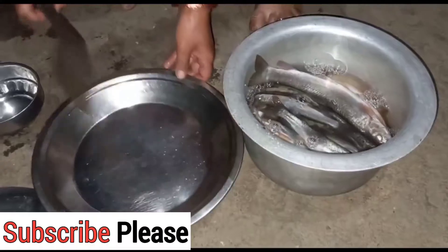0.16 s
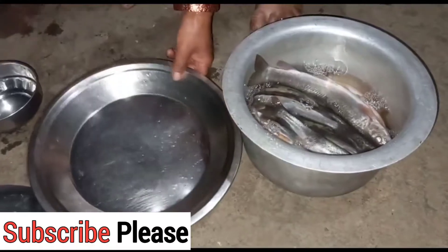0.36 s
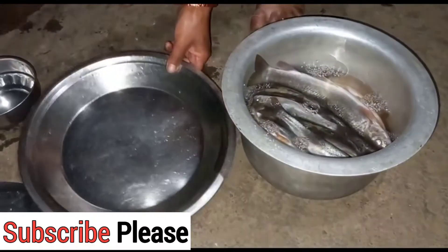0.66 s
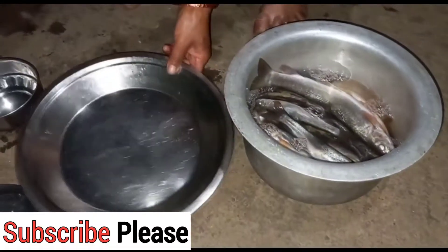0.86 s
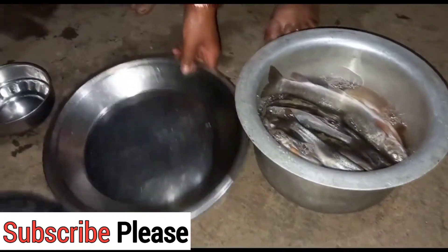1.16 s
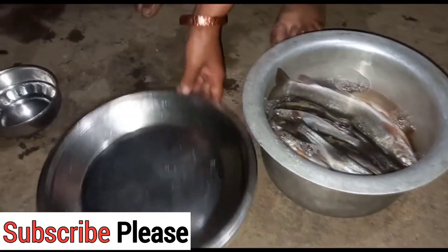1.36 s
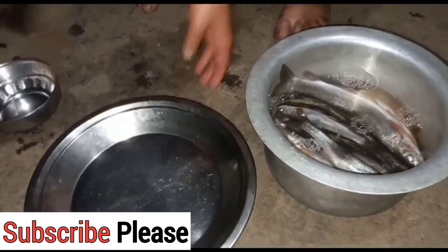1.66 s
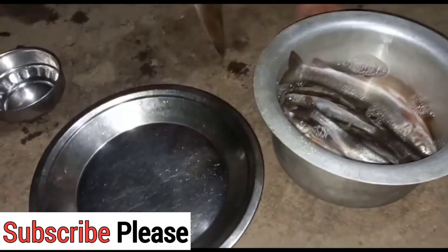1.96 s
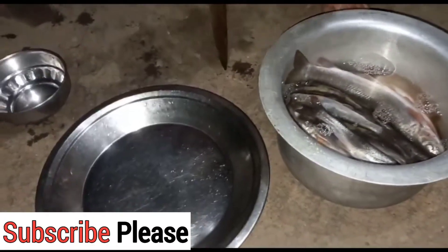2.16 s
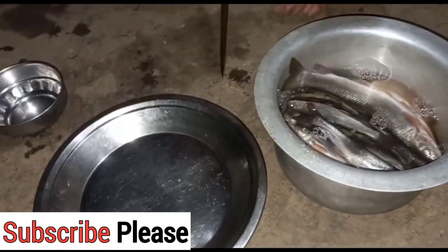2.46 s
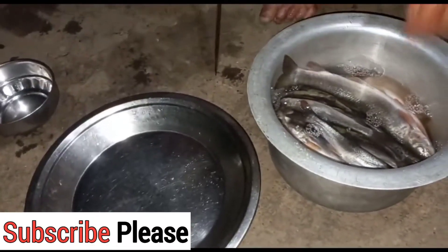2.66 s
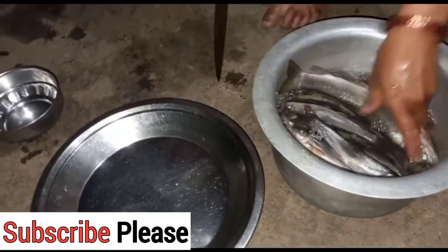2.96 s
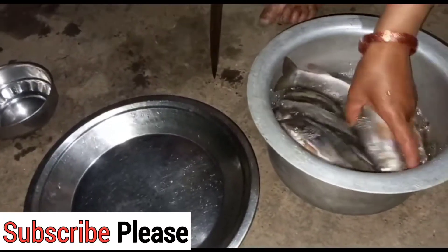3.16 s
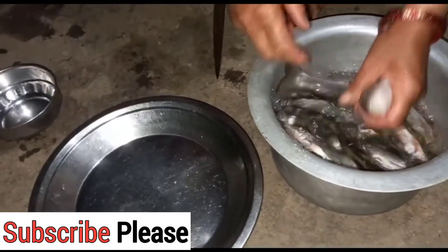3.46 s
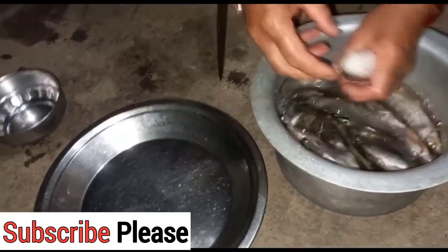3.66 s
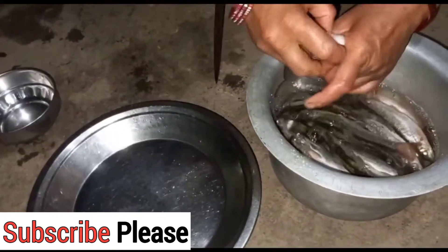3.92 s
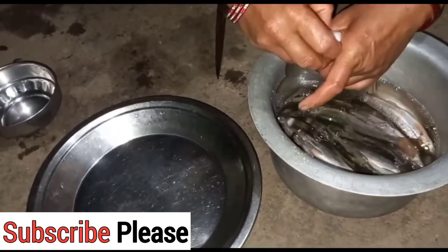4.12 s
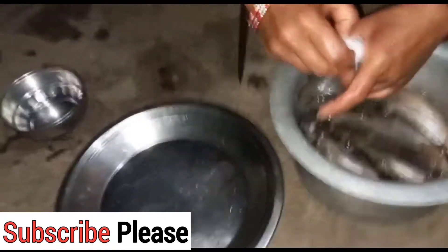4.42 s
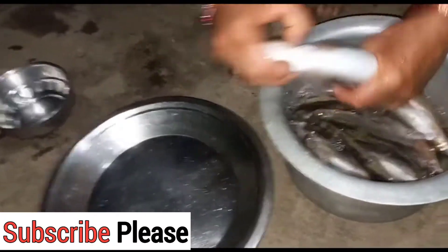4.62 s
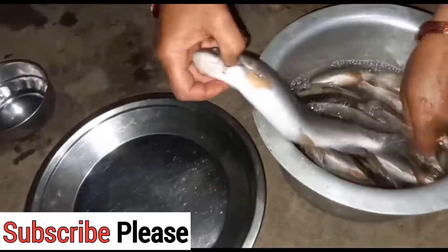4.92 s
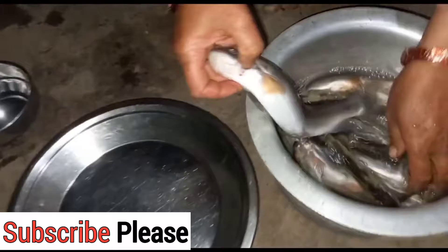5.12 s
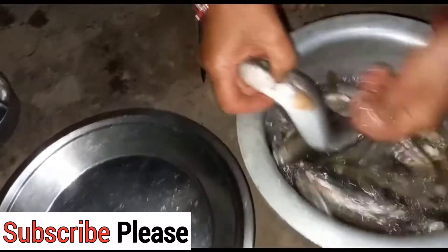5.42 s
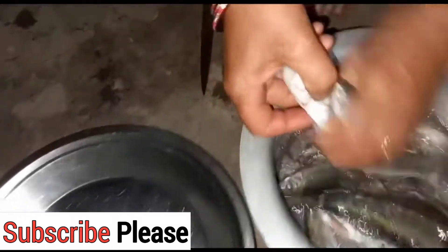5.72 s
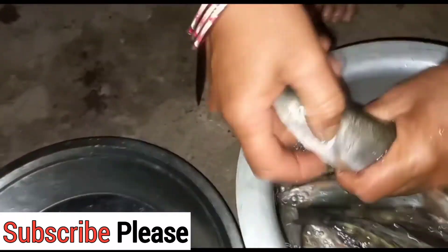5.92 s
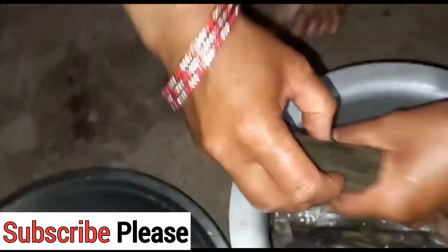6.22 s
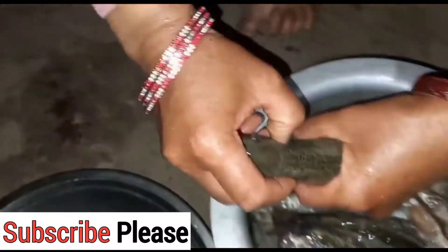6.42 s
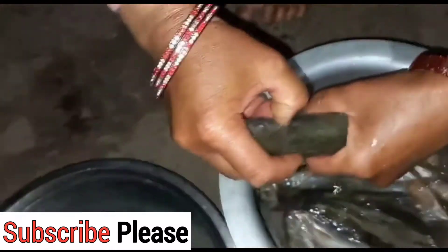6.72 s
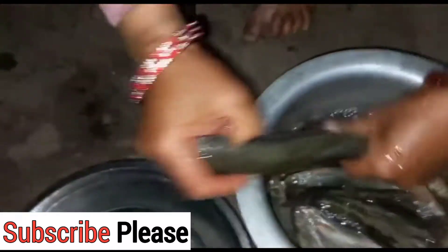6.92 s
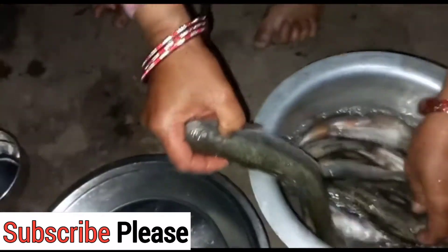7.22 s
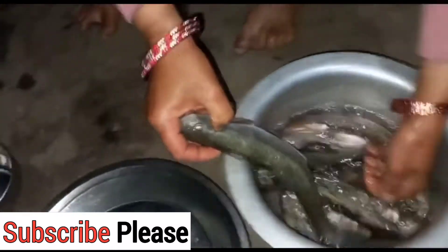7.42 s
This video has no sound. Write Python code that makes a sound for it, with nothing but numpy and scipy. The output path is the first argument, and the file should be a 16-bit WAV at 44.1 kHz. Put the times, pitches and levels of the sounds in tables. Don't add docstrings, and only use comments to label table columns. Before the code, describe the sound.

Close stereo pickup over a faint low hum, with little echo. From 0 s a thin steel basin scrapes across gritty concrete, with a hard knock at 0.16 and a lighter one near 0.4; it rings and fades by 1.0, with dull taps around 0.9. At 1.06 a bright clink starts a second, louder drag, with heavy knocks at 1.1 and 1.23; scraping lasts to about 1.7, then the rim rings away. A dull tap at 2.0, a faint clink and tap near 2.2, then near quiet. Around 3.1-3.5 hands dip into a pot: small bubbles and a gulp. Quiet faint rubbing, and one dry tap on the case at 4.57. From 5.0 fish and water are stirred, splashing at 5.4 with high drips and low surges to 6.0. From 6.15 to 6.7 come loud gurgles, plops and wet slaps. It calms, then a smaller splash and fizzing rub end it around 7.4-7.6.

```python
import sys
import numpy as np
from scipy import signal
from scipy.fft import rfft, irfft
from scipy.io import wavfile
from scipy.ndimage import uniform_filter1d

SR = 44100
rng = np.random.default_rng(int(sys.argv[2]) if len(sys.argv) > 2 else 0)


def to_wav(s):
    ch = np.atleast_2d(s).T
    pcm = np.round(np.clip(ch, -1, 1) * 32767)
    wavfile.write(sys.argv[1], SR, pcm.astype(np.int16))


def invert_db(level):
    return 10 ** (np.asarray(level, dtype=float) / 20)


N = 334271
SPAN = 3 * SR


def evened(x):
    return x / np.sqrt(np.mean(x ** 2) + 1e-20)


def read(points, hz):
    f, value = np.transpose(points)
    return np.interp(np.log(hz + 1), np.log(f + 1), value)


def control(tables, index, rest):
    t, out = np.arange(N) / SR, np.full(N, float(rest))
    for rows in tables:
        s, value = np.transpose(rows)[[0, index]]
        inside = (t >= s[0]) & (t <= s[-1])
        out[inside] = np.interp(t[inside], s, value)
    return out


def held(tables, rows):
    steps = [[(table[0][0], *row), (table[-1][0], *row)] for table, row in zip(tables, rows)]
    return [control(steps, index=k + 1, rest=0) for k in range(len(rows[0]))]


def add(mix, s, sound):
    part = mix[:, round(s * SR):][:, :sound.shape[1]]
    part += sound[:, :part.shape[1]]


def play(events, sound):
    out = np.zeros((2, N))
    for s, *shape in events:
        add(out, s, sound(*shape))
    return out


def panned(x, pan_db):
    return np.array([x * invert_db(pan_db / 2), x * invert_db(-pan_db / 2)])


def band(x, hz, width):
    edges = np.clip([hz - width / 2, hz + width / 2], 20, .49 * SR)
    return signal.sosfilt(signal.butter(2, edges, "band", fs=SR, output="sos"), x)


def noise_burst(t, hz, width):
    both, left, right = rng.standard_normal((len(t), 3)).T
    return evened(band(both + 3.0 * np.array([left, right]), hz, width))


def resonate(x, hz, width):
    turn = np.exp(2j * np.pi * np.cumsum(hz * np.ones(x.shape[-1])) / SR)
    r = np.exp(-np.pi * abs(width) / SR)
    return 2 * (turn * signal.lfilter([1 - r], [1, -r], x / turn)).real


def grains(per_s, spread_db):
    size = invert_db(spread_db * np.minimum(rng.exponential(1, N), 4)) * rng.choice([-1, 1], N)
    return evened(size * (rng.random(N) < per_s / SR))


def sharpened(x, top_db):
    top = band(x, 12000, 9000)
    return x + top * (invert_db(top_db) - 1)


# frequency in Hz, likeness (1 is the same).
LIKENESS = [(60, .9), (300, 0.74), (1000, 0.16), (4000, 0.091), (12000, 0.21)]


def noise(spectrum, patchy_db, flicker_db, size, count=N):
    frames, hz = 4 * count // size + 5, np.fft.rfftfreq(size, 1 / SR)
    a, b, c, d, patches = rng.standard_normal((frames, len(hz), 5)).T
    patches = uniform_filter1d(patches, size=6, axis=0)
    patches = evened(uniform_filter1d(patches, size=10, axis=1))
    flicker = evened(uniform_filter1d(rng.standard_normal(frames), size=3))
    same = np.clip(read(LIKENESS, hz), -1, 1)[:, None]
    left = a + 1j * b
    right = same * left + np.sqrt(1 - same ** 2) * (c + 1j * d)
    level_db = read(spectrum, hz)[:, None] + patchy_db * patches + flicker_db * np.clip(flicker, -2, 2)
    z = np.array([left, right]) * invert_db(level_db)
    return evened(signal.istft(z, nperseg=size, noverlap=3 * size // 4)[1][:, :count])


# frequency in Hz, level in dB per Hz.
HUSH_COLOUR = [(15, -59.5), (25, -32.5), (53, -29), (68, -11.5), (92, -1), (185, -31.5), (212, -24.5),
               (427, -22.5), (1230, -36.5), (1330, -33.5), (3920, -50), (6740, -38), (7920, -47),
               (14000, -45.5), (16000, -62.5)]


def hush():
    return invert_db(-61) * noise(HUSH_COLOUR, 2.9, 0.84, size=2048)


# frequency in Hz, time to fall by 60 dB in seconds.
YARD_DECAY = [(200, 0.23), (1000, 0.079), (4000, 0.17), (12000, 0.034)]


def yard(x):
    taps = np.zeros((2, SR // 2))
    at = np.arange(200, SR // 2 - 20, 20)
    at = at + rng.integers(0, 20, (2, len(at)))
    np.put_along_axis(taps, at, rng.choice([-1., 1.], at.shape), 1)
    hz, t, z = signal.stft(taps, SR, nperseg=256)
    fade = invert_db(-60 * t / read(YARD_DECAY, hz)[:, None])
    tail = signal.istft(z * fade, SR, nperseg=256)[1]
    return signal.fftconvolve(x, tail / np.linalg.norm(tail[0]), axes=1)[:, :N]


# start in seconds, level in dB, centre in Hz, width in Hz, length in seconds.
BRUSH_EVENTS = [(0.138, -33, 4480, 660, 0.17), (0.699, -48, 5200, 4800, 0.16), (1.1, -26, 3765, 90, .09),
                (2.425, -59, 5400, 9500, .11), (3.131, -56, 600, 694, 0.097), (3.15, -68, 3600, 400, .18),
                (4.638, -65.5, 5200, 3610, 0.15), (5.668, -49.5, 9000, 10100, .06),
                (6.4, -38.5, 1340, 540, 0.16), (7.157, -45, 3150, 3700, .1),
                (7.162, -50.5, 11000, 8000, .1), (7.475, -50, 1390, 1437, .09)]


def brush(db, hz, width, length):
    puff = noise_burst(np.arange(8000), hz, width)[:, :round(length * SR)]
    return invert_db(db) * puff * np.hanning(puff.shape[1])


# peak in dB, width in seconds, left over right in dB.
CASE_TAP = (-29, 0.00038, 17)


def flick():
    db, width, pan_db = CASE_TAP
    u = np.arange(-100, 200) / SR / width
    bump = (1 - u ** 2) * np.exp(-u ** 2 / 2)
    snap = 0.17 * rng.standard_normal(300) * np.exp(-abs(u) / .9)
    out = np.zeros((2, N))
    add(out, 4.5667, panned(invert_db(db) * (bump + snap), pan_db))
    return out


# time in seconds, hiss in dB.
RUBBING = [
    [(2.9, -91), (3.106, -69), (3.298, -69.5), (3.4, -60.5), (3.712, -77.5), (4.33, -86), (4.38, -69),
     (4.74, -63.5), (4.8, -71.5), (5.09, -73.5), (5.16, -60.5), (5.33, -54.5), (6.0, -61.5), (6.54, -53),
     (6.68, -52), (6.8, -71.5), (7.08, -69), (7.58, -50.5)],
]
# frequency in Hz, level in dB per Hz.
FIZZ_COLOUR = [(880, -38), (1500, -8), (2190, -6), (2740, -10), (6370, -1.5), (6760, -3.5), (7760, -13),
               (9650, -14), (13900, -14), (14800, -17), (16000, -58.5)]


def wet_hands():
    hiss_db = control(RUBBING, index=1, rest=-99)
    fizz = noise(FIZZ_COLOUR, 2.0, 1.6, size=256)
    fizz = sharpened(fizz, 2.5 + 0.4 * (hiss_db + 56.5))
    return fizz * invert_db(hiss_db + 3.0) * panned(np.ones(1), -1.4)


def bubble(db, hz, t60, pan_db, rise, snap):
    t = np.arange(3000) / SR
    tone = np.sin(2 * np.pi * hz * t * (1 + rise * t / t60)) * invert_db(-60 * t / t60)
    tone *= 1 - np.exp(-t * hz * 0.94)
    tick = snap * noise_burst(t, 1.1 * hz, 1.6 * hz) * invert_db(-60 * t / (1.6 * t60))
    return invert_db(db) * panned(np.ones(1), pan_db) * (tone + tick)


# start in seconds, peak in dB.
TAP_EVENTS = [
    (0.879, -43),
    (0.901, -36.5),
    (0.948, -41),
    (2.019, -36),
    (2.248, -30),
]


def tap(db):
    return bubble(db, 380, 0.011, -4.5, rise=0.23, snap=0.7)


# start in seconds, peak in dB, pitch in Hz.
DRIP_EVENTS = [(3.3646, -37.5, 5000), (4.5683, -43, 6607), (4.567, -44, 2400), (5.2533, -33, 6460),
               (5.2656, -31.5, 6400), (5.3527, -31.5, 6820), (5.389, -34, 6240), (5.4258, -33.5, 5900),
               (5.4435, -27, 4300), (5.665, -39.5, 5520), (5.6866, -34.5, 4730), (5.7675, -38.5, 4450),
               (5.786, -33.5, 3430), (5.855, -35.5, 4230), (5.8844, -40, 6540), (5.9083, -34, 4620),
               (6.1408, -38, 3670), (6.1586, -34, 3060), (6.4872, -22.5, 2890), (6.5334, -32, 3580),
               (6.6444, -18, 4440), (7.1112, -43.5, 6300), (7.1297, -44, 5720), (7.358, -33.5, 4940),
               (7.472, -25, 6370), (5.152, -46, 6500), (5.322, -44, 6000), (5.548, -44, 2800),
               (5.56, -44, 5300), (5.678, -40, 5500), (5.698, -38, 4800), (5.7, -40, 6500),
               (5.826, -44, 4200), (5.945, -44, 3700), (5.97, -45, 5800), (6.07, -44, 4400),
               (6.512, -30, 3000)]


def drip(db, hz):
    return bubble(db - 3.5, hz, 0.022, -3.5, rise=0.091, snap=0.41)


# start in seconds, peak in dB, pitch in Hz.
BLIP_EVENTS = [(3.3645, -31, 1140), (3.3947, -36.5, 2000), (5.3358, -23.5, 1630), (5.3649, -27.5, 1560),
               (5.3986, -22.5, 1313), (5.4691, -36, 1180), (5.5592, -43, 2200), (5.876, -49, 2010),
               (6.0177, -48.5, 2000), (6.109, -44, 2184), (6.352, -30, 1560), (6.536, -17, 915),
               (6.576, -21.5, 950), (6.6438, -18.5, 1405), (7.4717, -23.5, 1605), (7.505, -34, 1560),
               (5.127, -56, 2050), (5.183, -55, 1340), (5.218, -49, 1550), (5.228, -53, 1330),
               (5.262, -46, 1380), (5.264, -47, 1650), (5.288, -50, 1420), (5.31, -47, 1310),
               (5.466, -44, 2900), (7.355, -48.5, 1400), (7.442, -41, 1710), (7.442, -43, 2050),
               (7.47, -33, 1880), (7.488, -39, 1830), (7.523, -40, 1560), (7.555, -44, 1610)]


def blip(db, hz):
    return bubble(db - 1.5, hz, 0.05, -1.4, rise=0.034, snap=0.2)


# start in seconds, peak in dB, pitch in Hz.
BUBBLE_EVENTS = [(3.13, -44.5, 420), (3.159, -39, 420), (3.166, -39, 692), (3.343, -38, 400),
                 (3.378, -25, 397), (3.428, -30.5, 396), (3.45, -36.5, 422), (3.471, -37.5, 393),
                 (5.021, -52.5, 604), (5.118, -47, 643), (5.166, -46.5, 628), (5.22, -43, 686),
                 (5.263, -43, 850), (5.384, -29.5, 630), (5.397, -24, 838), (5.784, -46.5, 395),
                 (5.908, -37, 364), (6.152, -21, 500), (6.349, -23.5, 495), (6.381, -19, 474),
                 (6.411, -20.5, 492), (6.485, -12.5, 530), (6.504, -14, 475), (6.544, -10.5, 525),
                 (6.573, -14.5, 490), (6.62, -25, 495), (6.647, -16, 541), (7.401, -44.5, 413),
                 (7.443, -36, 350), (7.475, -34, 396), (3.376, -30.5, 680), (3.185, -46, 797),
                 (3.53, -49.5, 420), (5.13, -52, 400), (5.183, -49, 628), (5.222, -47, 400),
                 (5.243, -49, 660), (5.243, -50, 390), (5.334, -43, 637), (7.471, -34.5, 687),
                 (7.495, -42, 598), (7.507, -41, 730), (7.563, -44.5, 417)]


def big_bubble(db, hz):
    return bubble(db + 1.5, hz, .022 - .0014 * db, -2.9, rise=0.07, snap=0.22)


# start in seconds, peak in dB, pitch in Hz.
SLAP_EVENTS = [(3.323, -47, 600), (6.154, -21, 330), (6.195, -28, 775), (6.257, -32, 1140),
               (6.277, -33, 886), (6.349, -18, 260), (6.381, -20, 330), (6.397, -29, 1380),
               (6.412, -20, 420), (6.448, -30.5, 1350), (6.467, -25, 1420), (6.489, -22, 810),
               (6.577, -18, 820), (6.645, -20, 1897), (7.392, -45, 1500), (5.91, -40, 260),
               (6.835, -50, 350), (7.124, -44, 280), (7.21, -44, 320), (3.366, -41, 2200)]


def slap(db, hz):
    return bubble(db, hz, .014, -1.5, rise=.1, snap=.8)


# start in seconds, peak in dB, start pitch in Hz, end pitch in Hz, length in seconds.
GULP_EVENTS = [
    (3.102, -70, 2480, 2280, 0.19),
    (3.158, -80, 3750, 3500, 0.19),
    (3.466, -47.5, 1054, 1290, 0.029),
    (5.418, -28.5, 867, 1380, 0.033),
    (5.426, -28, 383.5, 403, 0.044),
    (6.43, -36.5, 1324, 1506, .07),
    (6.517, -16, 511, 560, .028),
    (6.657, -20, 507, 575, 0.019),
]


def gulp(db, start_hz, end_hz, length):
    hz = np.linspace(start_hz, end_hz, round(length * SR))
    wobble = evened(uniform_filter1d(rng.standard_normal(12000), size=350))[:len(hz)]
    tone = np.sin(2 * np.pi * np.cumsum(hz) / SR) * (1 + 5.5 * length * wobble)
    return invert_db(db) * panned(tone * signal.windows.tukey(len(hz), .7), -1.5)


# start in seconds, peak in dB, pitch in Hz.
SURGE_EVENTS = [
    (5.47, -39, 87),
    (5.556, -34, 97.6),
    (5.628, -41, 97.4),
    (5.93, -31.5, 57.97),
    (5.95, -35, 112.7),
    (6.007, -35.5, 81.6),
]


def surge(db, hz):
    return gulp(db - 6.0, hz, 0.92 * hz, 0.046) * panned(np.ones(1), -18.5)


def drops():
    out = play(BUBBLE_EVENTS, big_bubble) + play(BLIP_EVENTS, blip) + play(DRIP_EVENTS, drip)
    out += play(SLAP_EVENTS, slap) + play(TAP_EVENTS, tap)
    return out + play(SURGE_EVENTS, surge) + play(GULP_EVENTS, gulp)


# time in seconds, effort in dB, pitch of the air cavity in Hz.
STIRS = [
    [(3.05, -73.5, 390.5), (3.152, -68, 609), (3.3, -64, 482), (3.426, -45, 390), (3.5, -57, 400),
     (3.65, -73, 422)],
    [(4.95, -81.5, 497.6), (5.054, -64.5, 560), (5.372, -47.5, 633), (5.442, -30, 403.6), (5.522, -63, 379),
     (5.994, -64, 365), (6.1, -61.5, 363)],
    [(6.12, -87, 448), (6.152, -31, 490), (6.4, -31, 500), (6.67, -26, 528), (6.74, -45.5, 520),
     (6.78, -59, 420), (6.95, -70.5, 357)],
    [(7.05, -95, 409), (7.125, -53, 300), (7.3, -70, 400), (7.58, -51, 463.4)],
]
# splash in dB, heave of the water in dB.
GRIP_LEVELS = [
    (-47, -51),
    (-40, -44.5),
    (-49, -45),
    (-45, -39),
]


def stirring():
    effort_db = control(STIRS, index=1, rest=-130)
    splash_db, heave_db = held(STIRS, GRIP_LEVELS)
    over_db = effort_db + 39.5
    still = effort_db < -120
    splash_db = np.where(still, effort_db, splash_db + 1.1 * over_db)
    heave_db = np.where(still, effort_db, heave_db + 0.79 * over_db)
    return effort_db, splash_db, heave_db


def slosh():
    hz = control(STIRS, index=2, rest=450)
    gurgle_db, splash_db, heave_db = stirring()
    pockets = band(grains(400, 2.5) + .5 * rng.standard_normal(N), 560, 980)
    cavity = evened(resonate(pockets, hz, 64)) + evened(band(pockets, 360, 300))
    gurgle = evened(cavity) * invert_db(gurgle_db - 4.5)
    pops = sum(band(grains(220, 5.5), f, 0.29 * f) * 900 / f for f in (950, 1370, 2000, 2530))
    spray = evened(pops) + 2.6 * noise_burst(np.arange(N), 1000, 1200)
    splash = evened(spray) * invert_db(splash_db - 7.5)
    swell = evened(band(grains(90, 1.5), 78, 25)) + 0.46 * evened(band(pockets, 170, 47))
    heave = swell * invert_db(heave_db - 3.0)
    return gurgle + splash + panned(heave, -1.5)


# frequency in Hz, width in Hz, level in dB.
POT_TONES = [
    (520, 90, -20),
    (1400, 120, -12),
    (1560, 80, -14),
]


def pot(x):
    return x + sum(invert_db(db + 12) * band(x, hz, width) for hz, width, db in POT_TONES)


def metal(hz, db, t60, size):
    t = np.arange(size)[:, None] / SR
    port_phase = 1.8 * rng.standard_normal((len(hz), 2)).T[:, None] * hz / 3000
    phase = rng.uniform(0, 2 * np.pi, len(hz)) + port_phase
    fade = invert_db(db - 60 * t / np.maximum(t60, .02))
    ring = (fade * np.sin(2 * np.pi * hz * t + phase)).sum(-1)
    ring *= 1 - np.exp(-t[:, 0] / .0015)
    return ring / np.sqrt((ring ** 2).sum(1).mean())


def ringing(push, ring):
    return signal.fftconvolve(push[None], ring, axes=1)[:, :SPAN]


# time in seconds, push on the metal in dB.
PRESSURE = [
    [(0.0, -29.5), (0.15, -42.5), (0.162, -27), (0.216, -27), (0.482, -30), (0.62, -43), (0.834, -54.5),
     (1.04, -69.5)],
    [(1.055, -67), (1.059, -31.5), (1.12, -22.5), (1.2, -23), (1.272, -21.5)],
    [(1.272, -18), (1.4, -17.5), (1.6, -16.5), (1.68, -21), (1.956, -41), (2.206, -61.5)],
    [(2.206, -68), (2.211, -41.5), (2.256, -50), (2.31, -62.5), (2.382, -73), (2.9, -86.5)],
]
# grit over push in dB, sharpness of the grit in dB, floor rumble over push in dB.
FOOTING_LEVELS = [
    (-5.5, -17, -16),
    (-5, -14.5, -12),
    (-5, -15, -15.5),
    (10.5, -14, -7),
]


def footing():
    push_db = control(PRESSURE, index=1, rest=-99)
    rows = [(*row, stage[0][0]) for row, stage in zip(FOOTING_LEVELS, PRESSURE)]
    grit_db, sharp_db, rumble_db, start = held(PRESSURE, rows)
    since = np.arange(N) / SR - start
    bite_db = 9.5 * np.exp(-since / 0.076)
    firm_db = -24.5
    grit_db = grit_db + firm_db + 1.153 * (push_db - firm_db)
    rumble_db = rumble_db + push_db - 19 * since
    return np.array([grit_db, push_db, sharp_db + bite_db, rumble_db])[:, :SPAN]


# frequency in Hz, level in dB per Hz.
GRIT_COLOUR = [(290, -49.5), (500, -39.5), (868, -11), (988, -18), (1180, -5.5), (1740, -7), (6230, -7.5),
               (7530, -12.5), (14900, -17), (16000, -36.5)]


def floor_grit(grit_db, sharp_db):
    hiss = noise(GRIT_COLOUR, 1.8, 0.54, size=256, count=SPAN)
    return sharpened(hiss, sharp_db + 14.5) * invert_db(grit_db)


def floor_rumble(rub, rumble_db):
    return (evened(band(rub, 410, 400)) + .18 * evened(band(rub, 95, 70))) * invert_db(rumble_db)


# frequency in Hz, width in Hz, level in dB.
BASIN_TONES = [
    [(590, 36, -14), (1098, 200, -1.5), (1560, 36, -3), (905, 30, -3), (2200, 26, -8), (2573, 50, -10),
     (3750, 33, -14), (2940, 25, -10), (4210, 120, -13)],
    [(1180, 44, 0), (1550, 40, -13), (1980, 20, -17), (2200, 29, -11), (2610, 81, -16), (2940, 28, -17),
     (3760, 24, -7)],
    [(880, 27, -14), (1180, 51, 0), (1360, 27, -6), (2200, 29, -8), (2615, 52, -6), (3384, 24, -17),
     (3840, 130, -17), (4040, 31, -16)],
    [(880, 30, -6), (1155, 41, -3), (1560, 150, -9), (1882, 39, -10), (2140, 47, -11), (2588, 60, -6),
     (3390, 24, -13), (3923, 41, -12)],
    [(880, 24, -8), (1200, 99, 0), (2000, 33, -9), (2156, 50, -12), (2340, 64, -8), (2780, 47, -10),
     (3170, 29, -16), (3800, 53, -15)],
]
CONTACT_S = [0, 1.03, 1.275, 1.43, 1.68, 3]


def strong_tones(push, t):
    place, out = np.digitize(t, CONTACT_S) - 1, 0
    for k, peaks in enumerate(BASIN_TONES):
        hz, width, db = np.transpose(peaks + peaks)
        hz = hz + np.repeat([-.25, .25], len(peaks)) * width
        ring = metal(hz, db + 10 * np.log10(width), 2.1 / width, size=SR // 5)
        out = out + invert_db(-1.5) * ringing(push * (place == k), ring)
    return out


def weak_tones(push):
    hz = np.geomspace(550, 7000, 130) * rng.uniform(0.89, 1.01, 130)
    db = read(GRIT_COLOUR, hz) + rng.uniform(-4, 4, 130)
    return invert_db(-6) * ringing(push, metal(hz, db, 250 / hz + 0.045, size=SR // 3))


# frequency in Hz, level in dB, 60 dB fall in seconds.
BOWL_TONES = [(690, -5.5, 0.36), (895, -7.5, 0.7), (1096, -4.5, 0.67), (2800, -14, 1.0), (2990, -18, 0.76)]
# frequency in Hz, level in dB, 60 dB fall in seconds.
RIM_TONES = [(1230, -12, 1.0), (1382, 3, 1.0), (1595, -5, 1.1), (1744, -4, .8), (1900, -11, 1.0),
             (2000, -8, .8), (2105, -5, 1.2), (2342, -12, .9), (2697, -10, .5)]
EASE_S = (.55, 1.75)


def slow_tones(push, t):
    first = (t < CONTACT_S[1]) & (t > EASE_S[0])
    out = invert_db(-5.5) * ringing(push * first, metal(*np.transpose(BOWL_TONES), size=SR))
    return out + invert_db(-6) * ringing(push * (t > EASE_S[1]), metal(*np.transpose(RIM_TONES), size=SR))


# start in seconds, peak in dB, pitch in Hz, brightness in dB.
KNOCK_EVENTS = [
    (0.16, -7.5, 1258, -19),
    (0.382, -22.5, 1120, -17.5),
    (1.06, -24.5, 1180, -2.5),
    (1.109, -11.5, 1080, -12),
    (1.226, -6, 1180, -28),
    (2.211, -34, 1400, -3),
    (2.212, -36, 3110, -20),
]


def knock(db, hz, bright_db):
    t = np.arange(4000) / SR
    blow = (np.sin(2 * np.pi * hz * t) + .5 * noise_burst(t, 1500, 570)) * invert_db(-60 * t / 0.026)
    clash = noise_burst(t, 5500, 3000) * invert_db(bright_db + 3.5 - 60 * t / 0.29)
    return invert_db(db) * (blow + clash) * (1 - np.exp(-t / 0.0005))


# frequency in Hz, lead in radians.
PORT_LEAD = [(1, 1.1), (1100, 0.56), (2000, 2.2), (2600, 6), (5000, 8), (16000, 30.5)]


def later(x):
    size = 4 * SR
    lead = np.interp(np.fft.rfftfreq(size, 1 / SR), *np.transpose(PORT_LEAD))
    return irfft(rfft(x, size) * np.exp(-1j * lead))[:SPAN]


def basin():
    grit_db, push_db, sharp_db, rumble_db = footing()
    rub = evened(rng.standard_normal(N) + 1.3 * grains(900, 6.7))[:SPAN]
    push = rub * invert_db(push_db)
    for s, db, *_ in KNOCK_EVENTS:
        push[round(s * SR)] += invert_db(db + 13.5)
    t = np.arange(SPAN) / SR
    out = floor_grit(grit_db, sharp_db) + floor_rumble(rub, rumble_db)
    out += strong_tones(push, t) + weak_tones(push) + slow_tones(push, t)
    out += play(KNOCK_EVENTS, knock)[:, :SPAN]
    return np.pad([out[0], later(out[1])], [(0, 0), (0, N - SPAN)])


# frequency in Hz, level in dB.
MIC_TONE = [(30, -13.5), (65, 1.5), (5000, 1), (6400, 7), (7000, -0.5), (7700, -3), (9500, -0.5),
            (15000, 2)]


def microphone(x):
    hz = np.linspace(0, SR / 2, 1025)
    colour = signal.firwin2(2047, hz, invert_db(read(MIC_TONE, hz)), fs=SR)
    return signal.oaconvolve(x, colour[None], "same", axes=1)


def scene():
    steel, water = basin(), pot(slosh()) + drops()
    echo = yard(invert_db(-14) * steel + invert_db(-23) * water)
    near = steel + water + echo + flick() + play(BRUSH_EVENTS, brush)
    return microphone(near) + wet_hands() + hush()


def top_cut(x):
    return signal.sosfilt(signal.butter(12, 16320, fs=SR, output="sos"), x)


def record(dry):
    hz, t, z = signal.stft(dry, SR, nperseg=2048, noverlap=1536)
    power = abs(z) ** 2
    patch = uniform_filter1d(uniform_filter1d(power, size=10, axis=1), size=4, axis=2)
    wide = uniform_filter1d(patch, size=70, axis=1)
    clear = (patch > .9 * wide) | (wide > invert_db(2 * -66))
    keep = (power > .8 * patch) & clear | (hz < 7000)[:, None]
    treble = power[:, hz > 7000].sum((0, 1))
    keep |= np.roll(treble, -2) > 30 * np.roll(treble, 2)
    thinned = signal.istft(z * np.where(keep, 1, .1), SR, nperseg=2048, noverlap=1536)[1][:, :N]
    return top_cut(thinned)


dry = scene()
out = record(dry)
to_wav(out)
```